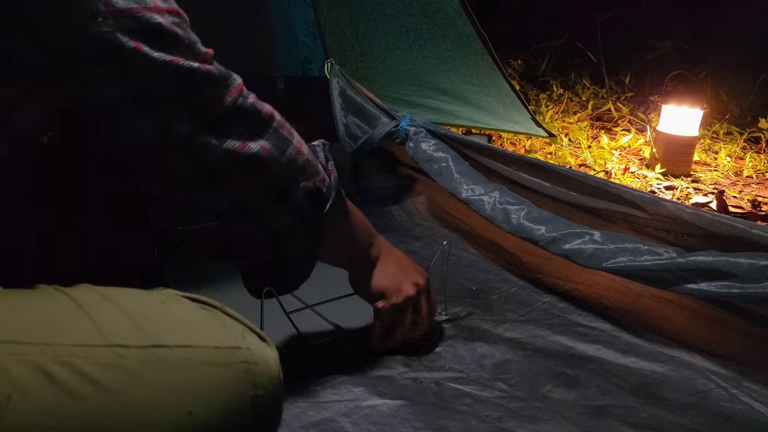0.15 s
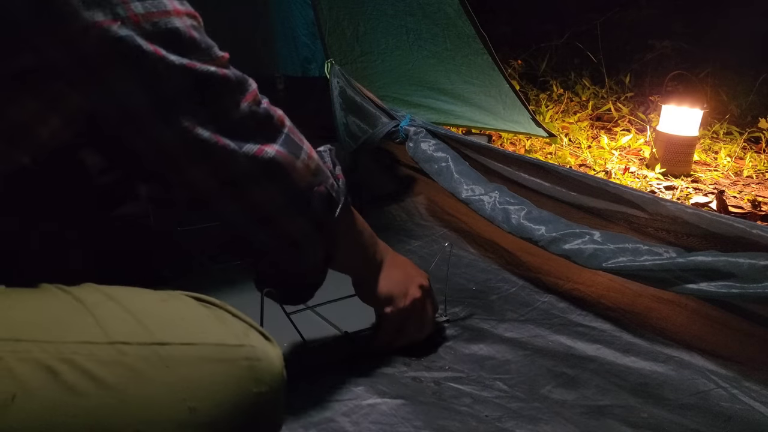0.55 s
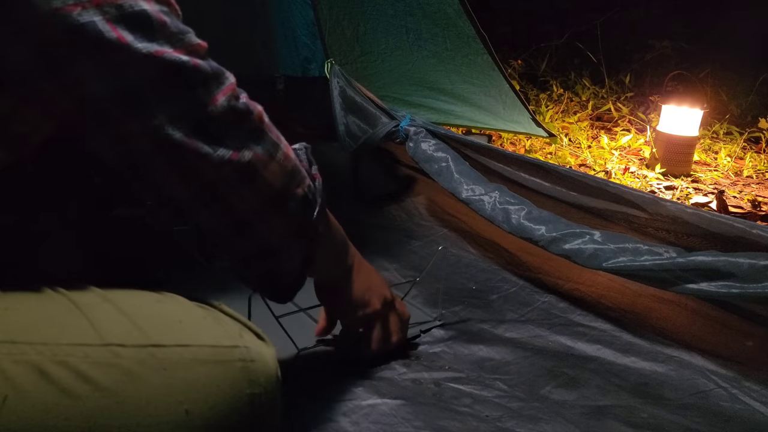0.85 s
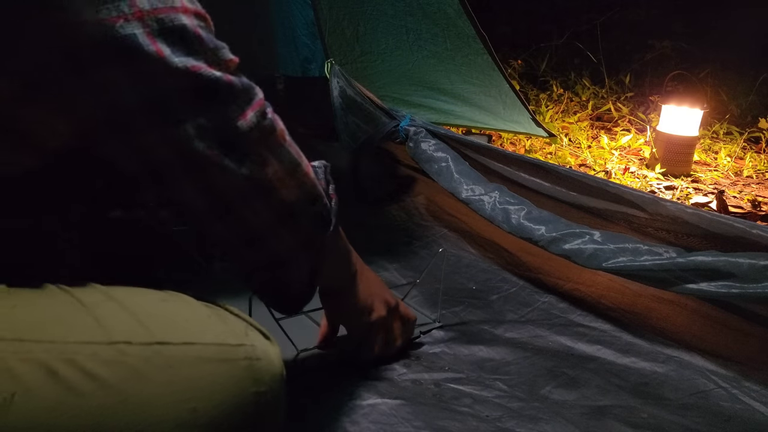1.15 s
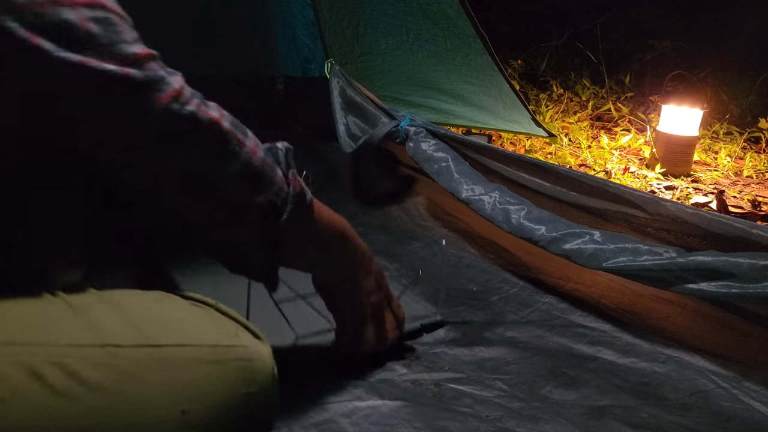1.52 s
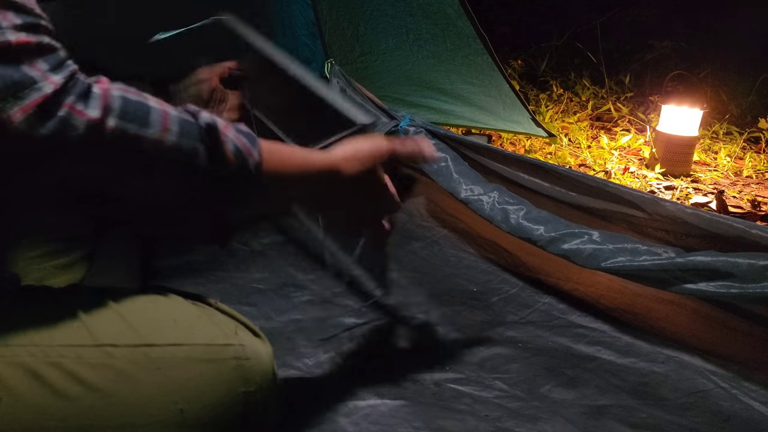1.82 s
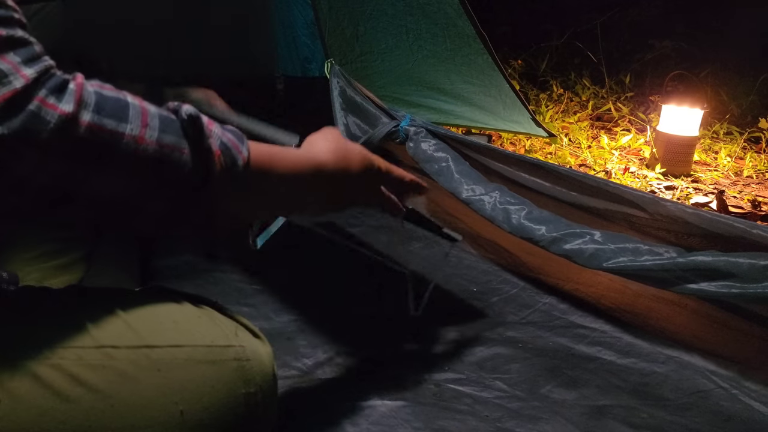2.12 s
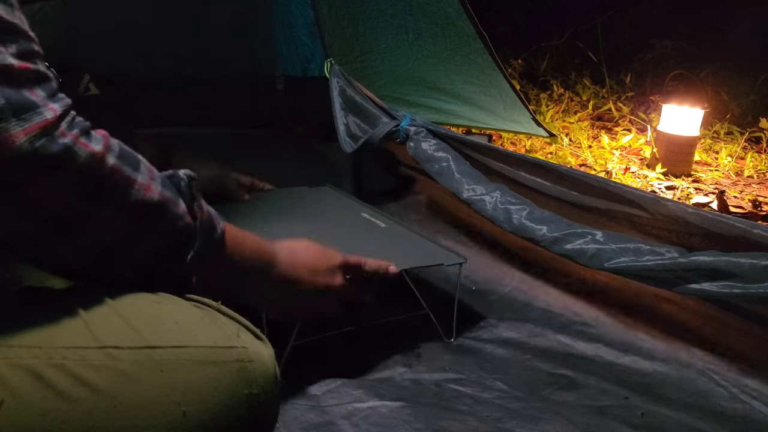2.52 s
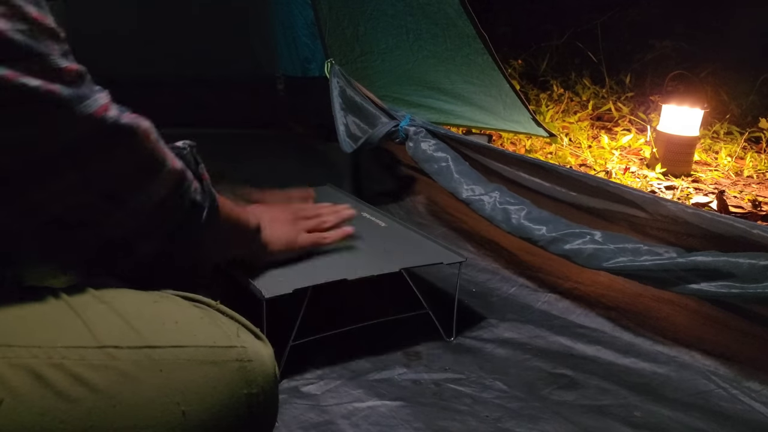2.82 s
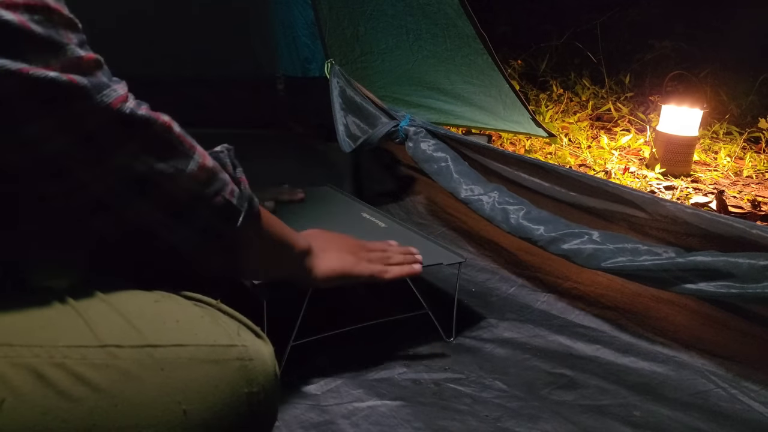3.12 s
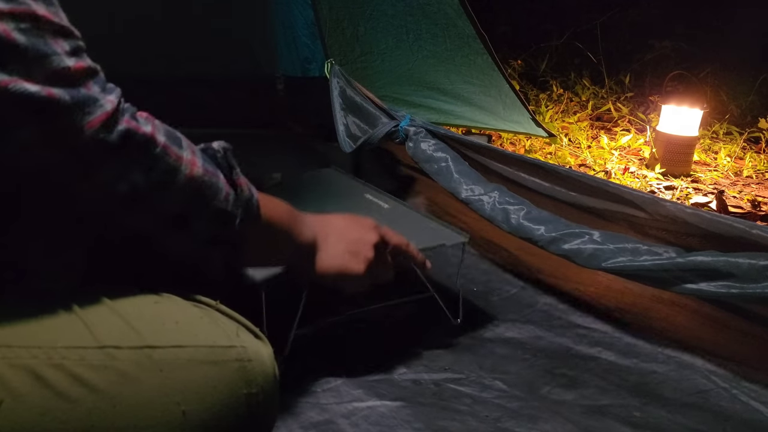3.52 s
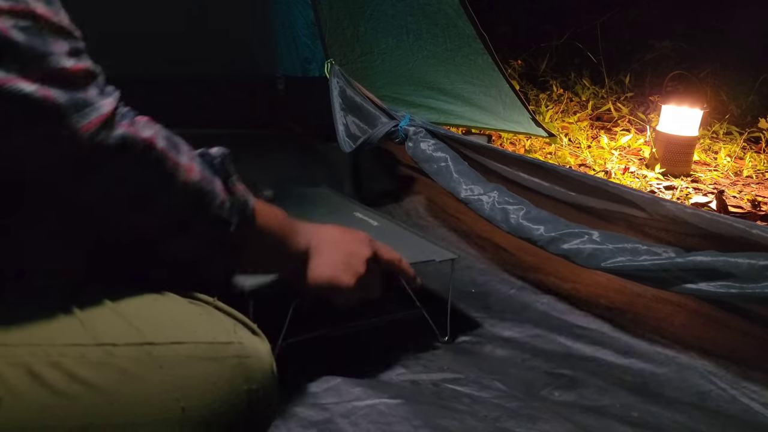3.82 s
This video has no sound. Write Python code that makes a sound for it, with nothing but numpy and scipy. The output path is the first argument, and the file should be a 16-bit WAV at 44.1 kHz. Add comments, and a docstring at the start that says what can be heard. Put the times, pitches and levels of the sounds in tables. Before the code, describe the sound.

A small metal folding table is handled up close in a tent: light knocks and a leg snap, then a sharp knock, metallic scrapes, thudding feet and hand pats, over faint crickets and low rumble.

```python
"""Camp table in a tent at night

A small metal table is unfolded and set on the groundsheet: decaying tones and bursts of noise knock and ring.
Its wire legs snap and scrape in their clips as quick slips restrike the metal; low thuds are the feet landing.
Sleeves and hands rub as grainy swells of noise, and the tent walls add a short, weak tail.
Outside, coloured noise makes a low rumble, soft air, a cricket chorus and pulsing bush cricket calls.
"""
import sys
import numpy as np
from scipy import signal
from scipy.fft import rfft, irfft, next_fast_len
from scipy.io import wavfile
from scipy.ndimage import uniform_filter1d

SR = 44100
rng = np.random.default_rng(int(sys.argv[2]) if len(sys.argv) > 2 else 0)


def generate_wav(signal):
    """Clip the signal to [-1, 1] and save it as 16-bit WAV at the path in sys.argv[1]."""
    frames = np.transpose(np.atleast_2d(signal))
    scaled = np.clip(frames, -1, 1) * 32767
    pcm = np.round(scaled).astype(np.int16)
    wavfile.write(sys.argv[1], SR, pcm)


N = 174195
T = np.arange(N) / SR  # seconds
BLOW = T[:SR // 3]  # time since one contact began, s
TURN = 2 * np.pi


def amp(db):
    """Turns decibels into a gain."""
    return 10 ** (np.asarray(db) / 20)


def unit(x):
    """Scales a sound to an average (rms) strength of 1."""
    return x / np.sqrt(np.mean(x ** 2) + 1e-20)


def read(points, hz):
    """Reads a table between its points, with pitch spaced as the ear hears it (logarithmically)."""
    f, value = np.transpose(points)
    return np.interp(np.log(hz + 1), np.log(f + 1), value)


def level_over_time(points):
    """Turns a table of times and decibels into a gain that glides from point to point."""
    return amp(np.interp(T, *np.transpose(points)))


def add(mix, s, sound):
    """Adds a sound to the mix at time s, cutting it off at the end."""
    part = mix[:, max(round(s * SR), 0):][:, :sound.shape[-1]]
    part += sound[..., :part.shape[1]]


def play(rows, make_sound):
    """Makes one sound per table row: the first column is its time, the rest describe it."""
    out = np.zeros((2, N))
    for s, *row in rows:
        add(out, s, make_sound(*row))
    return out


# How alike left and right are, 1 = the same (f/Hz, likeness)
LIKENESS = [(100, .99), (300, 0.76), (700, 0.35), (1500, 0.17), (3000, 0.067), (8000, 0.033)]


def noise(colour, size, tilt=0):
    """Stereo noise of rms 1, alike in the bass and diffuse in the treble; tilt is dB/octave above 500 Hz."""
    hz = np.fft.rfftfreq(size, 1 / SR)
    a, b = rfft(rng.standard_normal((2, size)))
    same = np.clip(read(LIKENESS, hz), 0, 1)
    mid = a * np.sqrt(1 + same)
    side = b * np.sqrt(1 - same)
    colour_db = read(colour, hz) + tilt * np.log2(np.maximum(hz, 500))
    return unit(irfft(np.array([mid + side, mid - side]) * amp(colour_db), size))


def dull(x, hz):
    """A soft contact has little treble: a two-pole low-pass takes it away."""
    return signal.lfilter(*signal.butter(2, min(hz, SR / 2 - 100), fs=SR), x)


def burst(rise, decay):
    """A loudness shape that rises smoothly, then dies away (both in seconds)."""
    fade_in = np.sin(np.pi / 2 * np.minimum(BLOW / rise, 1))
    return fade_in * np.exp(-np.maximum(BLOW - rise, 0) / decay)


def grains(size, depth, grain_s=0.001):
    """Uneven stick and slip, as a wavering gain of rms 1."""
    wander = uniform_filter1d(rng.standard_normal(size), max(int(grain_s * SR), 1))
    return unit(np.exp(depth * unit(wander)))


def clicks(size, per_s, spread_db):
    """Random tiny contacts of uneven strength and either sign."""
    strength_db = spread_db * np.minimum(rng.exponential(1, size), 3)
    strength = amp(strength_db) * rng.choice([-1, 1], size)
    return strength * (rng.random(size) < per_s / SR)


def ring(modes, rise):
    """Struck metal rings as decaying tones, with phases that differ more between sides in the treble."""
    hz, db, t60 = np.transpose(modes)[:, :, None]
    side_phase = rng.standard_normal((2, len(modes), 1)) * (1 - read(LIKENESS, hz)) / 4
    phase = rng.random((len(modes), 1)) + side_phase  # in cycles
    tones = amp(db - 60 * BLOW / t60) * np.sin(TURN * (hz * BLOW + phase))
    return tones.sum(1) / np.linalg.norm(amp(db)) * np.minimum(BLOW / rise, 1)


# Tone of the low rumble, relative (f/Hz, level/dB)
RUMBLE_COLOUR = [(20, -40), (35, -32), (50, 3.5), (68, 2.5), (88, 6), (110, -1), (150, -12.5), (220, -23),
                 (400, -40), (900, -90)]
# Rise and fall of the rumble (t/s, level/dB)
RUMBLE_LEVEL = [(0.0, -42.5), (0.19, -33), (0.3, -42.5), (0.34, -29), (0.59, -36), (0.64, -25), (0.75, -33),
                (2.45, -39), (2.57, -24), (2.63, -34.5), (3.61, -36.5), (3.67, -19), (3.81, -42.5),
                (3.95, -29.5)]


def rumble():
    """Bass-heavy noise that swells and sinks."""
    return level_over_time(RUMBLE_LEVEL) * noise(RUMBLE_COLOUR, next_fast_len(N))[:, :N]


# Tone of the soft air, relative (f/Hz, level/dB)
AIR_COLOUR = [(100, 13), (300, -1), (600, -5), (1500, -1), (2300, -5), (3000, 2), (4000, -8), (4800, -1),
              (5700, -7), (8300, -6.5), (10000, -19), (12500, -18.5), (16000, -21)]


def air():
    """Steady, soft noise behind everything."""
    return amp(-46.5) * noise(AIR_COLOUR, next_fast_len(N))[:, :N]


# Tone of the cricket chorus, relative (f/Hz, level/dB)
CRICKET_COLOUR = [(4500, -58), (5900, -84), (6300, -5), (6550, 2.5), (6950, 5), (7150, -11.5),
                  (7500, -23.5), (9500, -59)]
# Loudness of the chorus, before a 0.5 dB lift (t/s, level/dB)
CRICKET_LEVEL = [(0.0, -45.5), (0.65, -43.5), (1.3, -42.5), (1.55, -48), (3.2, -45.5), (3.3, -47.5),
                 (3.95, -45.5)]


def crickets():
    """Many crickets blur into a narrow band of noise whose loudness drifts."""
    chorus = noise(CRICKET_COLOUR, next_fast_len(N))[:, :N]
    return amp(0.5) * level_over_time(CRICKET_LEVEL) * chorus


# Tone of cloth and skin, relative, before each rub's tilt (f/Hz, level/dB)
RUB_COLOUR = [(100, -25), (400, -26.5), (900, -12), (1700, -6.5), (3200, -2), (5500, -3), (8000, 1.5),
              (10300, -4), (13000, 0.5), (16000, -7)]
# Rubs of sleeves and palms (loudest t/s, level/dB, rise/s, fall/s, tilt/dB per octave)
RUBS = [(.045, -47, 0.015, 0.044, -4), (.735, -34.5, 0.049, 0.042, -5.5), (.84, -38.5, 0.049, 0.055, -4),
        (.95, -42, 0.046, 0.056, -7.5), (1.25, -49, 0.065, 0.072, -2), (1.55, -42, 0.11, 0.078, -4),
        (1.76, -47, 0.072, 0.091, -3.5), (1.816, -33.5, 0.016, 0.036, -0.5),
        (1.932, -46.5, 0.06, 0.053, -1.5), (2.15, -45.5, 0.067, 0.11, -1.5),
        (2.499, -45.5, 0.053, 0.098, -3), (2.62, -46, 0.032, 0.27, -3.5), (2.825, -35.5, .055, 0.06, -3.5),
        (2.936, -40, 0.034, 0.11, -3), (3.135, -25.5, 0.066, 0.077, -1), (3.28, -38, 0.033, 0.063, -3.5),
        (3.375, -38, 0.056, 0.032, -.5), (3.519, -44.5, 0.047, 0.075, -1), (3.672, -26, 0.021, 0.017, -2),
        (3.721, -39.5, 0.024, 0.068, -2.5), (3.88, -37, 0.041, 0.026, -1.5), (3.95, -32.5, 0.019, .02, -5)]


def rubbing():
    """Cloth and skin stick and slip in grainy swishes, with tiny catches on the table."""
    catches_per_s, catch_db, catch_spread_db = 41, -19, 15.5
    tick_colour = [(100, -31), (600, -5), (2500, 2), (5000, 0), (15000, -17.5)]  # (f/Hz, level/dB)
    out = np.zeros((2, N))
    for s, db, rise, fall, tilt in RUBS:
        start = max(s - 3 * rise, 0)
        t = T[:SR // 2] + start - s  # time from the loudest moment
        swell = np.exp(-.75 * (t / np.where(t < 0, rise, fall)) ** 2)
        swish = grains(len(t), depth=0.15) * noise(RUB_COLOUR, len(t), tilt)
        tick = noise(tick_colour, len(BLOW)) * np.exp(-BLOW / 0.0021)
        contacts = clicks(len(t), catches_per_s, catch_spread_db)
        catches = unit(signal.fftconvolve(tick, contacts[None], axes=1)[:, :len(t)])
        add(out, start, amp(db) * swell * (swish + amp(catch_db) * catches))
    return out


# Tones of the folded table while it is gripped; the snap uses them too (f/Hz, level/dB, 60 dB decay/s)
GRIPPED_MODES = [(498, -10, 0.033), (799, -6, 0.085), (1122, -16, 0.053), (1260, -5, 0.039),
                 (1427, -9, 0.09), (2103, -6.5, .04), (2585, -6, 0.047), (2950, -9, 0.036),
                 (3600, -17, 0.085), (4030, -7, 0.024)]
# Knocks on the top (t/s, level/dB, pitch f/Hz, brightness f/Hz, clatter level/dB)
KNOCKS = [(0.0264, -33.5, 1010, 3000, -8), (0.1798, -32.5, 694, 2200, -10), (0.3048, -27, 800, 2220, -8),
          (0.461, -25, 1700, 3000, -8), (0.6161, -37, 550, 1500, 0), (0.674, -24.5, 1660, 2650, -2),
          (0.9119, -22.5, 1240, 2580, -7.5), (0.9946, -24.5, 700, 1800, -11), (1.0577, -40, 657, 1600, -2),
          (1.109, -43.5, 900, 2010, 0.5), (1.162, -42, 890, 2010, 0.5), (1.2094, -31.5, 734, 6500, -0.5),
          (1.4939, -5, 596, 1880, -12), (1.553, -16, 574, 3200, -8.5), (1.6075, -18.5, 700, 2090, -11),
          (2.3085, -17, 557, 2480, -8), (2.53, -25, 870, 1820, 2), (2.8385, -22.5, 1530, 5040, -5.5),
          (2.866, -11, 500, 2380, -14), (2.957, -29.5, 420, 2000, -5), (3.093, -22, 1880, 2960, -0.5),
          (3.1033, 0, 600, 1950, -13), (3.2351, -16.5, 1170, 1900, -9.5), (3.4995, -38, 492, 1800, 3.5),
          (3.528, -35.5, 510, 1820, -1.5), (3.588, -20.5, 664, 3330, -2.5), (3.64, -30.5, 920, 1470, -0.5),
          (3.8456, -28, 1130, 3430, 0.5), (3.869, -34.5, 900, 2500, 1), (3.9278, -39, 935, 1800, 1)]


def knock(db, hz, bright_hz, clatter_db):
    """The hand-damped top pops for a cycle or two, rebounds, and the frame clatters after it."""
    pop_cycles, body_db = 1.1, -35
    push_hz, push_decay_s, push_delay_s, push_db = 196.3, 0.0041, 0.0037, -9
    clatter_rise_s, clatter_decay_s, tail_decay_s, tail_db = 0.0014, 0.0074, 0.0086, -24
    clatter_colour = [(100, 3.5), (280, -11.5), (400, -1), (600, -2), (1500, 0),
                      (3000, -1), (6000, 0), (15000, -3)]  # (f/Hz, level/dB)
    pop = np.exp(-BLOW * hz / pop_cycles) * np.cos(TURN * hz * BLOW)
    # The rebound is a slower push that starts a little late
    late = np.maximum(BLOW - push_delay_s, 0)
    push = amp(push_db) * np.exp(-late / push_decay_s) * np.sin(TURN * push_hz * late)
    body = dull(pop + push + amp(body_db) * ring(GRIPPED_MODES, clatter_rise_s), bright_hz)
    body = dull(body, 4.3 * bright_hz)  # a second, gentler trim of the treble
    shape = burst(clatter_rise_s, clatter_decay_s) + amp(tail_db) * burst(clatter_rise_s, tail_decay_s)
    clatter = shape * unit(dull(noise(clatter_colour, len(BLOW)), bright_hz))
    return amp(db) * (body + amp(clatter_db) * clatter)


# Tone of a bush cricket, relative (f/Hz, level/dB)
CALL_COLOUR = [(8000, -38), (10800, -23), (11900, 2), (13000, -2), (14000, -6), (16000, -17)]
# Bush cricket calls (start t/s, length/s, level/dB before pulsing)
CALLS = [(0.272, 0.3, -62), (1.162, 0.34, -67), (3.436, 0.63, -45.5)]


def bush_cricket_call(length, db):
    """A high hiss pulses in quick syllables, with soft edges at start and end."""
    syllables_per_s, depth, edge_s = 22, .45, 0.02
    t = T[:SR]
    gate = np.clip(np.minimum(t, length - t) / edge_s, 0, 1)
    pulse = 1 + depth * np.sin(TURN * syllables_per_s * t)
    return amp(db) * gate * pulse * noise(CALL_COLOUR, SR)


# Tone of the chattering leg, relative (f/Hz, level/dB)
SNAP_COLOUR = [(100, -9), (400, -3.5), (900, 0), (2600, -7.5), (4500, -5), (5600, -23.5), (7800, -10.5),
               (10000, -25.5), (12500, -20.5), (16000, -34)]
# A leg springs out of its clip (t/s, level/dB)
SNAPS = [(0.4202, -9)]


def snap(db):
    """A leg chatters against the gripped top as it leaves its clip: gritty noise over ringing metal."""
    rise_s, decay_s, grit_db, ring_db = 0.0046, 0.0085, -3, 4.5
    grit = noise(SNAP_COLOUR, len(BLOW)) * burst(rise_s, decay_s) * grains(len(BLOW), depth=0.12)
    return amp(db) * (amp(grit_db) * grit + amp(ring_db) * ring(GRIPPED_MODES, rise_s))


# Tone of the scraping hiss, relative (f/Hz, level/dB)
SCRAPE_COLOUR = [(100, -11), (700, -12), (1900, -9.5), (2700, 1), (3100, -2), (3550, -6), (4200, -5.5),
                 (5200, -7), (6200, 0.5), (7000, -0.5), (8000, 0.5), (10000, -1), (11000, -3), (13000, 5.5),
                 (16000, -5)]
# Tones of the table top (f/Hz, level/dB, 60 dB decay/s)
TOP_MODES = [(491, -2.5, 0.28), (580, -15, 0.41), (715, -7.5, 0.22), (802, -14, 0.3), (1000, -9, 0.097),
             (1078, -4.5, .22), (1260, 0.5, 0.25), (1410, 4, 0.22), (1485, 9, 0.2), (1880, -15, 0.064),
             (2036, 3, 0.11), (2480, 3, 0.15)]
# Tones of the wire legs (f/Hz, level/dB, 60 dB decay/s)
WIRE_MODES = [(1480, -15, 0.067), (2480, -6, 0.095), (2647, 1.5, 0.13), (2900, -32, .12), (3060, 0.5, 0.16),
              (3134, -12, 0.2), (3430, 3, 0.13), (3570, 0, 0.089), (3900, -11, 0.092), (4673, -7, 0.089),
              (5010, -0.5, 0.1), (5500, -25, .14), (6400, -6, 0.032), (7460, -9, .05), (7540, 2, 0.063),
              (8184, 0, 0.055)]
# Legs scraping in their hinges (t/s, level/dB, rise/s, decay/s, brightness f/Hz, wire level/dB, top level/dB)
SCRAPES = [(1.4514, -18, 0.0075, 0.012, 16000, -7, -15.5), (1.69, -34, 0.0083, 0.012, 6000, 9, -5),
           (1.738, -30.5, 0.011, .014, 5640, 10.5, 1), (1.829, -31.5, 0.012, 0.018, 2840, -7, 9),
           (1.923, -25, 0.0059, 0.012, 10100, -29, -22), (2.113, -34.5, 0.011, 0.032, 7040, 5.5, -6),
           (2.145, -36.5, .007, 0.0056, 6950, 2, -2.5), (2.234, -34, .005, 0.012, 8850, 1.5, -11),
           (2.5325, -17, .007, 0.01, 8350, -10, -26)]


def scrape(db, rise, decay, bright_hz, wire_db, top_db):
    """A quick run of slips keeps restriking a pair of wires and the top."""
    slips_per_s, slip_share = 300, 0.48
    twin_hz, twin_gain = 55.3, 0.38
    hiss = unit(dull(noise(SCRAPE_COLOUR, len(BLOW)), bright_hz))
    hiss = hiss * grains(len(BLOW), depth=0.07) * burst(rise, decay)
    # The paired legs are slightly unlike, so their tones beat against each other
    detune = rng.uniform(-1, 1, len(WIRE_MODES))
    twin = np.array(WIRE_MODES) + np.outer(detune, [twin_hz, 0, 0])
    wires = (ring(WIRE_MODES, rise / 2) + twin_gain * ring(twin, rise)) / np.hypot(1, twin_gain)
    metal = amp(wire_db) * wires + amp(top_db) * dull(ring(TOP_MODES, rise / 2), bright_hz)
    # Each slip strikes the metal again
    slips = clicks(len(BLOW), slips_per_s, spread_db=4) * burst(rise, decay)
    slips = slips / (np.linalg.norm(slips) + 1e-9)
    restruck = signal.fftconvolve(metal, slips[None], axes=1)[:, :len(BLOW)]
    return amp(db) * (hiss + np.sqrt(1 - slip_share ** 2) * metal + slip_share * restruck)


# Tone of the crunching groundsheet, relative (f/Hz, level/dB)
CRUNCH_COLOUR = [(60, -20), (200, -1), (330, -6.5), (500, -10), (700, -12.5), (950, -9.5), (1600, -13),
                 (3000, -13.5), (5000, -20), (8000, -17), (10500, -20.5), (13000, -18), (16000, -30)]
# Tones of the table standing on its feet (f/Hz, level/dB, 60 dB decay/s)
STANDING_MODES = [(220, -4, 0.056), (298, 6, 0.046), (370, -26, 0.034), (482, 8.5, 0.13),
                  (525, -6.5, 0.081), (663, 2.5, 0.059), (860, -6, 0.06), (933, -15, 0.084),
                  (1270, -27, 0.052), (2945, -19, .15), (3720, -24, .13)]
# Feet landing or shifting (t/s, thud level/dB, thud f/Hz, crunch level/dB, ring level/dB)
LANDINGS = [(2.5614, -12, 116, -16, -13.5), (3.504, -40, 119, -43, -26.5), (3.53, -40, 121, -44, -33.5),
            (3.6696, -8, 162.3, -18, -10), (3.943, -18.5, 131, -28.5, -47)]


def landings():
    """The feet crunch into the groundsheet, thud as a short low tone, and set the table ringing."""
    thud_rise_s, thud_decay_s = 0.0044, .011
    crunch_lead_s, crunch_rise_s, crunch_decay_s = 0.0081, 0.016, 0.015
    out = np.zeros((2, N))
    for s, thud_db, hz, crunch_db, ring_db in LANDINGS:
        thud = burst(thud_rise_s, thud_decay_s) * np.sin(TURN * hz * BLOW)
        crunch = burst(crunch_rise_s, crunch_decay_s) * noise(CRUNCH_COLOUR, len(BLOW))
        add(out, s, amp(thud_db) * thud)
        add(out, s - crunch_lead_s, amp(crunch_db) * crunch)  # starts just before the thud
        add(out, s, amp(ring_db) * ring(STANDING_MODES, thud_rise_s))
    return out


def tent(x):
    """The fabric walls return a short, weak tail of fading noise."""
    tail_db, t60_s, rise_s = -19.5, .13, 0.0071
    tail_colour = [(100, 3), (1000, -5), (6000, 2), (15000, -13.5)]  # (f/Hz, level/dB)
    tail = noise(tail_colour, len(BLOW)) * burst(rise_s, t60_s / np.log(1000))
    tail = tail / np.linalg.norm(tail[0])
    return x + amp(tail_db) * signal.fftconvolve(x, tail, axes=1)[:, :N]


# How much louder the table and hands are on the left than on the right (f/Hz, level/dB)
LEFT_OVER_RIGHT = [(100, -2), (250, 2), (500, 3.5), (1200, 4), (2500, 6), (4500, 3), (7500, 9.5),
                   (9000, 0.5), (13000, 4)]


def scene():
    """The table is handled a little to the left, with the night all around."""
    night = rumble() + air() + crickets() + play(CALLS, bush_cricket_call)
    table = play(KNOCKS, knock) + play(SNAPS, snap) + play(SCRAPES, scrape) + landings()
    near = tent(table + rubbing())
    size = next_fast_len(N + SR // 10)
    lean_db = read(LEFT_OVER_RIGHT, np.fft.rfftfreq(size, 1 / SR)) / 2  # half up left, half down right
    near = irfft(rfft(near, size) * amp([lean_db, -lean_db]), size)[:, :N]
    return near + night * amp([[.4], [-.4]])


def record(dry):
    """The loudest peaks are rounded off, then a low-pass removes the highest treble."""
    knee, ceiling, edge_hz = 0.62, .95, 15600  # knee and ceiling are shares of full scale
    room = ceiling - knee
    body = np.clip(dry, -knee, knee)
    rounded = body + room * np.tanh((dry - body) / room)
    low_pass = signal.firwin(511, edge_hz, window=("kaiser", 9), fs=SR)
    return signal.oaconvolve(rounded, low_pass[None], "same")


dry = scene()
out = record(dry)
generate_wav(out)
```